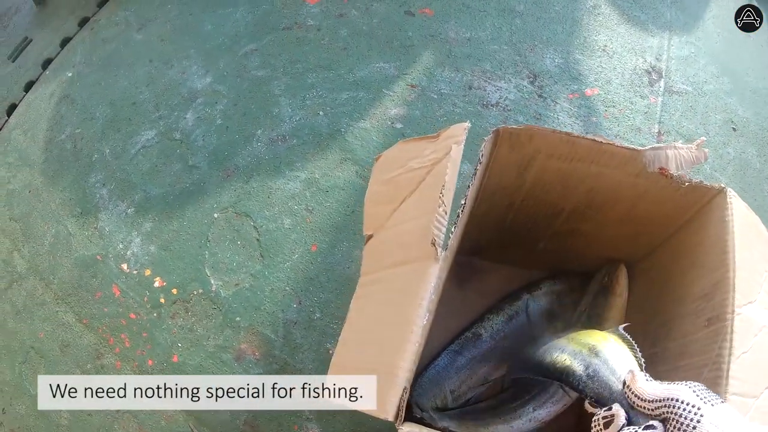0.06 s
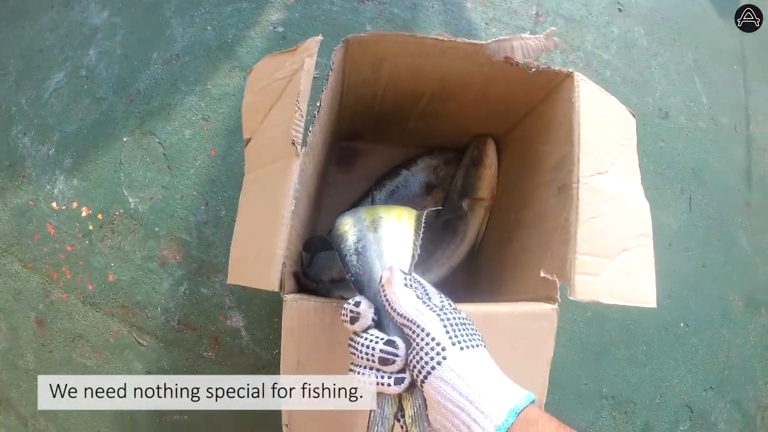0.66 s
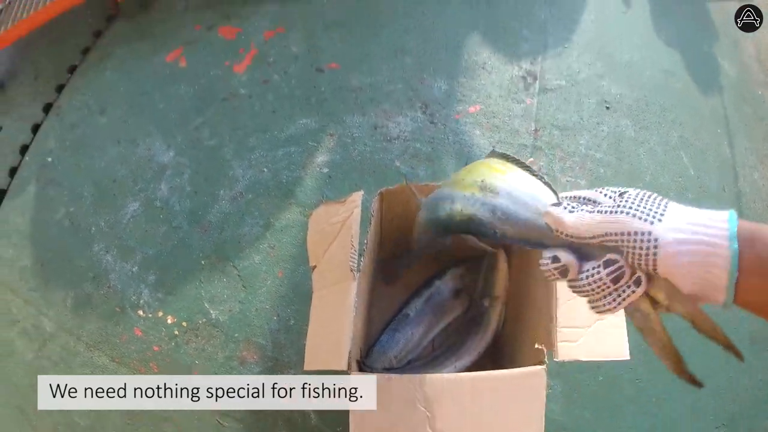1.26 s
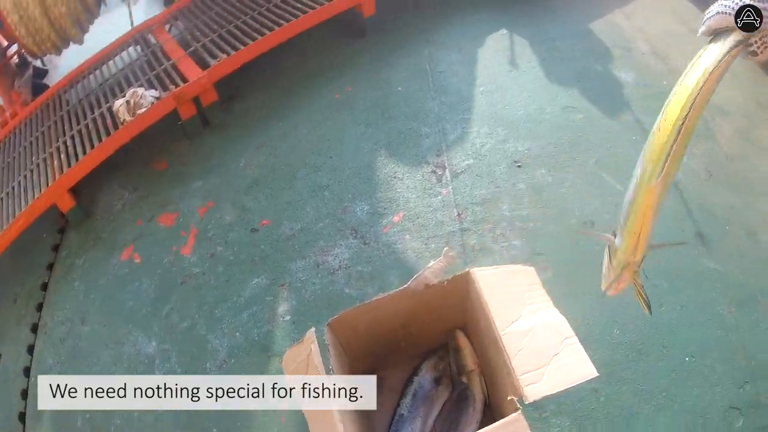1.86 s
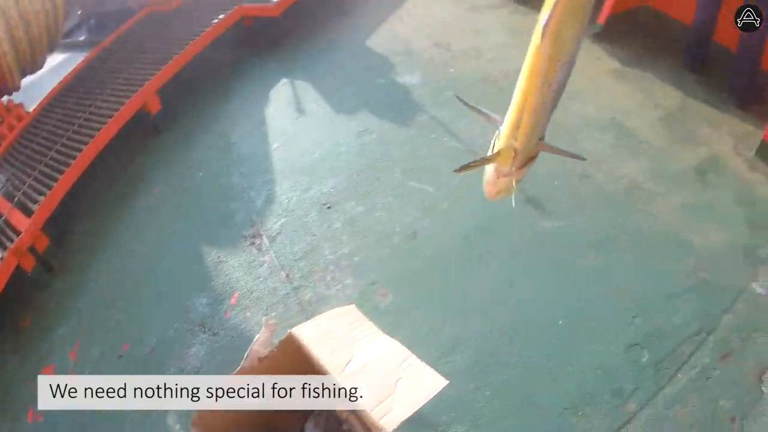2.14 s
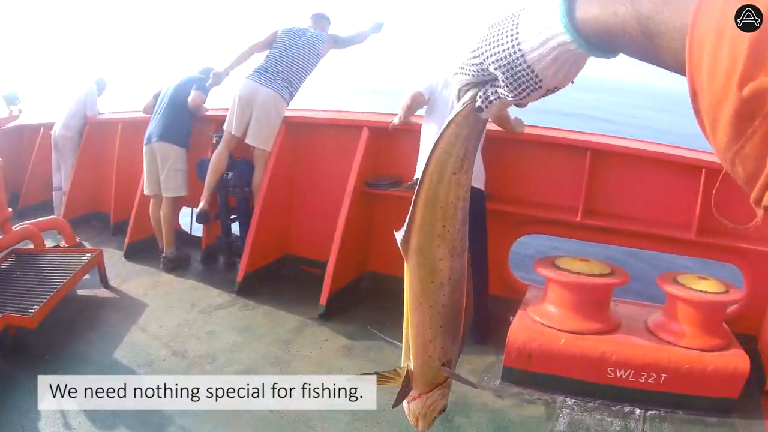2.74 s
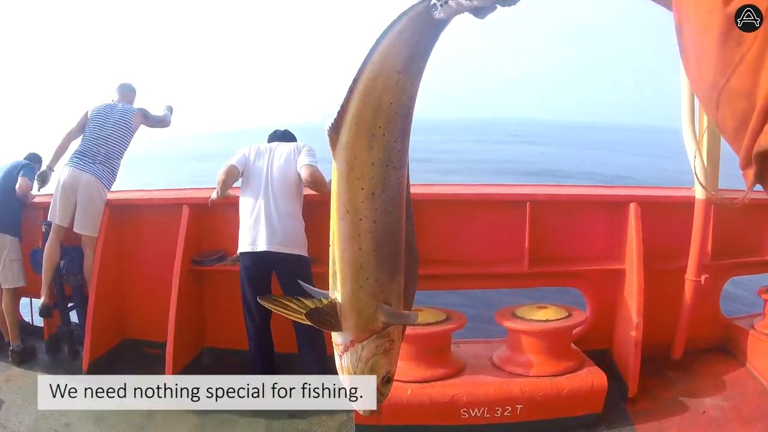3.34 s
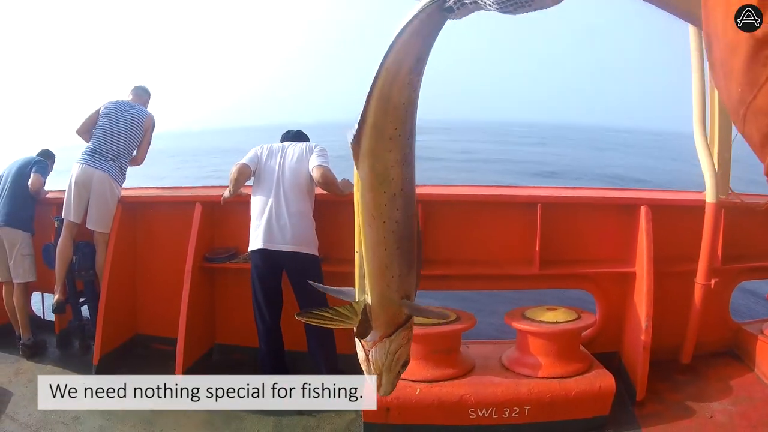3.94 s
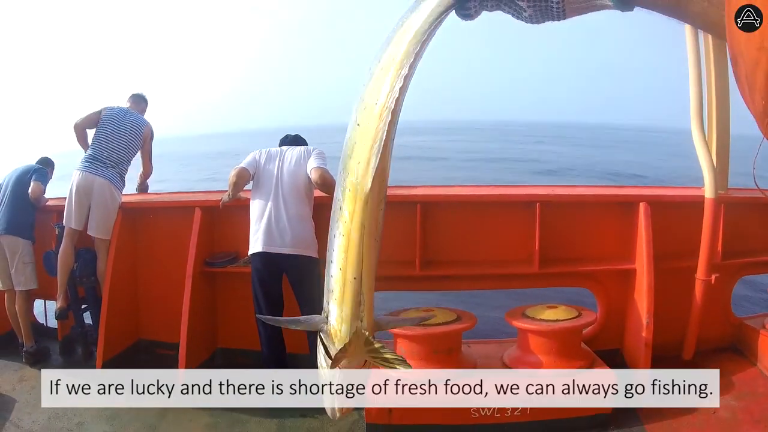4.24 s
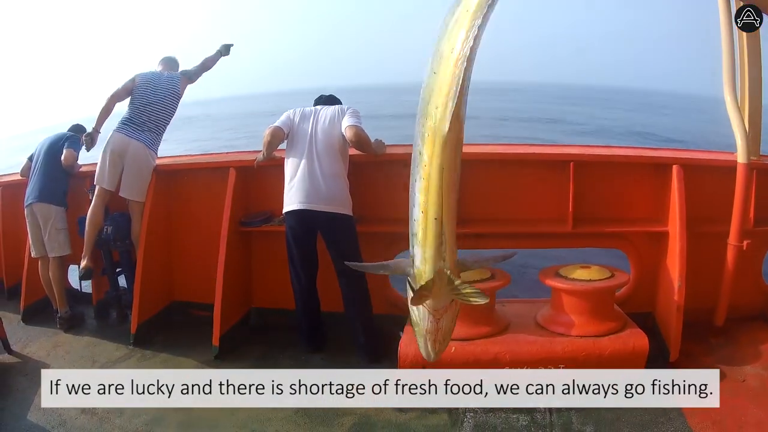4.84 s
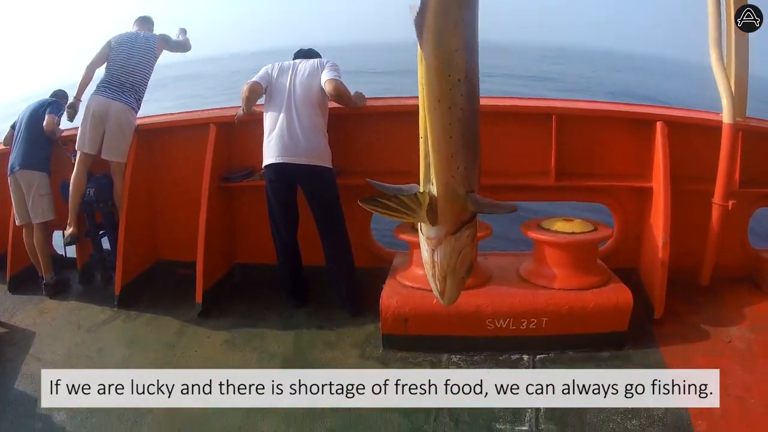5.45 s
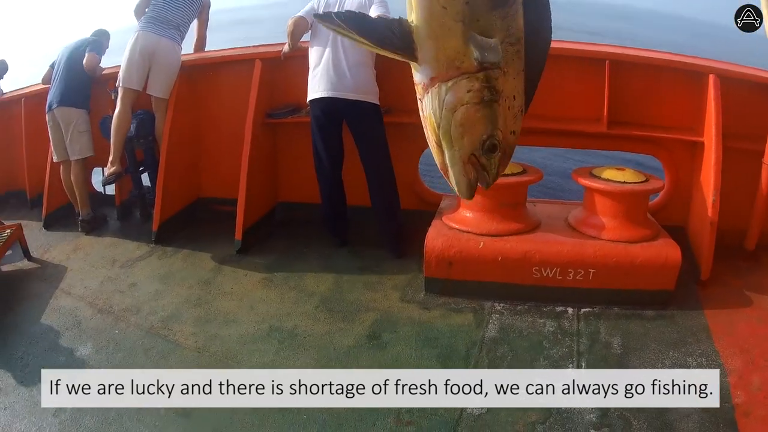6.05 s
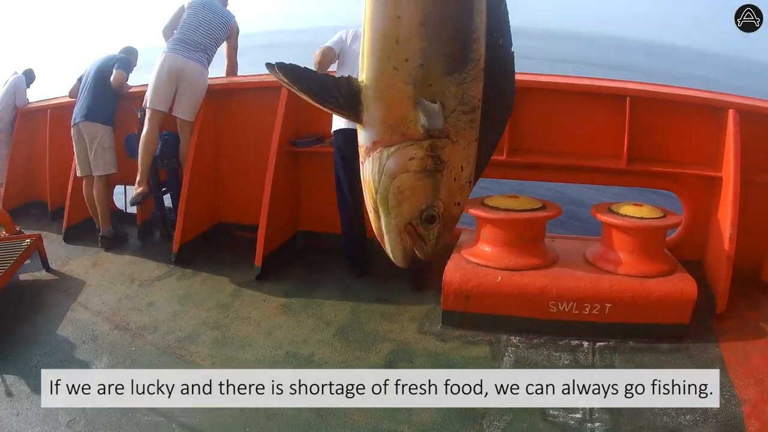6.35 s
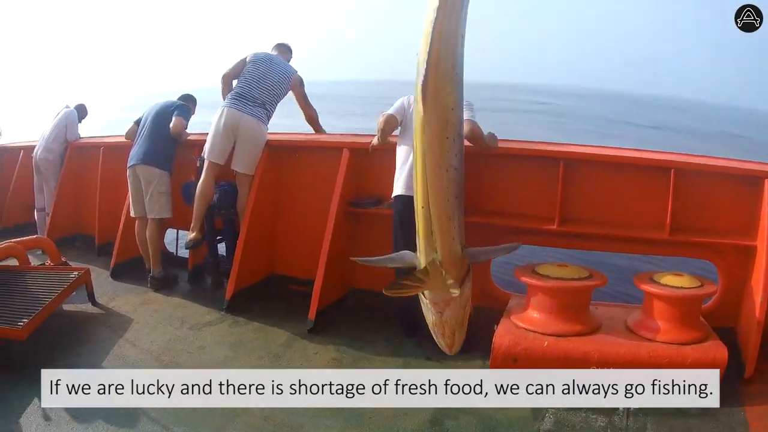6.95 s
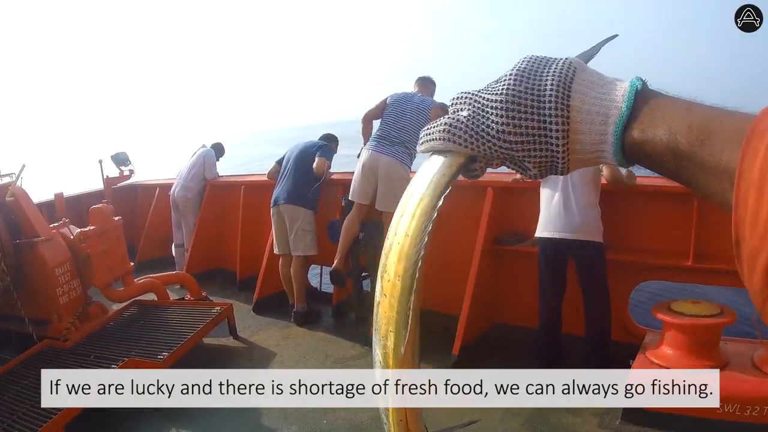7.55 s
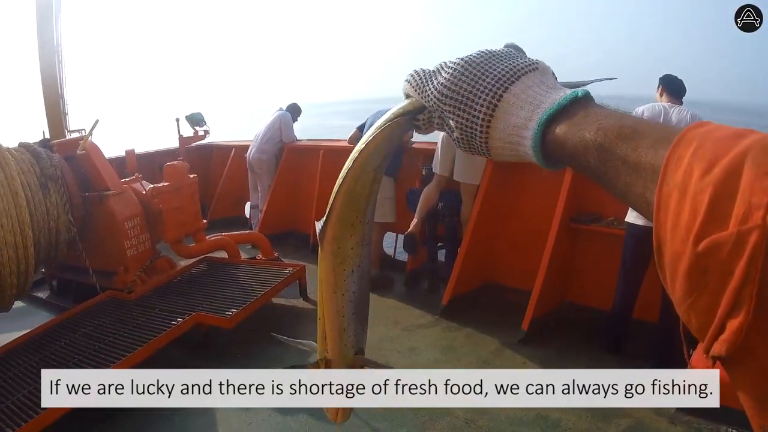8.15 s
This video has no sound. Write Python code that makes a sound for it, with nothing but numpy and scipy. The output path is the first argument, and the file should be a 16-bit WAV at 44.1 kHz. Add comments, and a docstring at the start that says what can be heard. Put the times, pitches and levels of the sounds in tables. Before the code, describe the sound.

Wind buffets a single microphone on the open deck of a ship at sea. Throughout, a diesel engine throbs below with a low rumble, the steel plating hums, and ventilation fans roar with a thin, wavering whine that swells and fades. A very faint high hiss returns every few seconds. Low gusts are strongest in the first second and again around 2.3 seconds. From about 1.6 to 3 seconds the machinery changes colour slightly as the listener turns towards the sea, the deep engine tones softening. Close by, at about 2.5 and 2.8 seconds, a gloved hand holding a fish ticks softly. The wind eases through the middle, with brief low bumps near 4.2 and 6 seconds. From about 6.7 seconds the drone shifts back, and more low gusts thump the microphone between 7 and 7.5 seconds, the machinery running on to the end at about 8 seconds.

```python
"""On the open deck of a ship at sea, one microphone at the listener's position, wind buffeting it.
From the start a diesel generator throbs below, the steel bulwark hums and the engine-room fans roar
and whine; a faint hiss returns every few seconds. After 1.6 s the listener looks up and turns to the
sea, and the machinery changes colour. Close by, at 2.5 and 2.8 s, a gloved hand holding a fish ticks
softly. From 6.7 s the listener turns back towards the winches, and more low gusts hit the microphone."""
import sys
import numpy as np
from scipy.fft import rfft, irfft, next_fast_len
from scipy.io import wavfile
from scipy.ndimage import map_coordinates

SR = 44100
rng = np.random.default_rng(int(sys.argv[2]) if len(sys.argv) > 2 else 0)


def transcribe(signal):
    """Save signal, clipped to [-1, 1], as a 16-bit WAV file at the path in sys.argv[1]."""
    frames = np.atleast_2d(signal).T
    limited = np.clip(frames, -1, 1)
    pcm = np.round(limited * 32767).astype(np.int16)
    wavfile.write(sys.argv[1], SR, pcm)


N = 361619
CYCLE_HZ = 7.5  # the diesel's four-stroke cycle


def amp(db):
    """Decibels to gain."""
    return 10 ** (np.asarray(db) / 20)


def unit(x):
    """Scale to rms 1."""
    return x / np.sqrt(np.mean(x ** 2) + 1e-20)


def clock():
    """Time of each sample in seconds."""
    return np.arange(N) / SR


def curves(rows):
    """One value per sample for each column after the time."""
    times, *columns = np.transpose(rows)
    return [np.interp(clock(), times, column) for column in columns]


def wobble(rate):
    """A smooth random curve, rate knots a second."""
    return map_coordinates(rng.standard_normal(int(N * rate / SR) + 4), [clock() * rate])


def swell(t, sigma):
    """A bell-shaped rise and fall around time t."""
    return np.exp(-.5 * ((clock() - t) / sigma) ** 2)


def swing(period_s, crest_s):
    """A regular swing between -1 and 1, highest at crest_s."""
    return np.cos(2 * np.pi * (clock() - crest_s) / period_s)


def filtered(x, response):
    """Filter x by a gain that is a function of frequency."""
    size = next_fast_len(N + SR // 2)
    return irfft(rfft(x, size) * response(np.fft.rfftfreq(size, 1 / SR)), size)[:N]


def rush(spectrum):
    """Noise of rms 1 coloured by (f/Hz, level/dB) points."""
    f, db = np.transpose(spectrum)
    white = rng.standard_normal(N)
    return unit(filtered(white, lambda hz: amp(np.interp(np.log(hz + 1), np.log(f), db))))


def resonant_noise(centre_hz, width_hz):
    """Noise of rms 1 in one steep-sided resonance."""
    white = rng.standard_normal(N)
    return unit(filtered(white, lambda hz: 1 / (1 + (2 * (hz - centre_hz) / width_hz) ** 2)))


def tone(hz, drift):
    """A sine of rms 1 whose phase wanders by drift radians."""
    return np.sqrt(2) * np.sin(2 * np.pi * (hz * clock() + rng.random()) + drift)


def diesel(seaward):
    """Below deck, uneven firing sounds multiples of the cycle rate, all on one hunting shaft."""
    # the engine's low lines: multiple of the cycle rate, relative level/dB
    orders = [(4, -11), (6, -3), (8, 0.5), (9, -5.5), (11, -12)]
    shaft_drift = .035 * wobble(1.52)
    lines = sum(amp(db + 2 * wobble(3.06)) * tone(k * CYCLE_HZ, k * shaft_drift) for k, db in orders)
    return amp(-30.5 - 4.5 * seaward) * lines


def exhaust(engine_db):
    """The funnel's rumble and the casing's roar swell once per engine cycle."""
    # spectrum of the funnel: f/Hz, relative level/dB
    funnel_spectrum = [(50, -25), (92, -16), (107, -10), (120, -14), (136, -0.5), (160, 0.5), (170, -7),
                       (182, -4.5), (196, -10), (240, -30), (600, -72.5)]
    # spectrum of the casing: f/Hz, relative level/dB
    casing_spectrum = [(120, -27), (205, -4.5), (240, -2), (280, 0), (310, -3.5), (380, -2.5), (500, -5.5),
                       (600, -8.5), (720, -12), (1000, -18.5), (1600, -45), (4000, -90)]
    funnel_db = -31.5 + .66 * wobble(1.98)
    throb = tone(CYCLE_HZ, .16 * wobble(1.85))
    funnel = amp(funnel_db + .88 * throb) * rush(funnel_spectrum)
    casing = amp(engine_db - 1.46 + .59 * throb) * rush(casing_spectrum)
    return funnel + casing


def bulwark(engine_db, upright):
    """The engine shakes the plating into a wavering hum, louder as the listener looks up."""
    # resonances of the steel plates: f/Hz, width/Hz, relative level/dB
    plates = [(106.1, 6.4, 1.5), (119.8, 2.2, 2), (183, 7.4, 0.5), (231.6, 7.3, -2), (244.9, 7.8, -3),
              (269.7, 8.4, 1.5), (358.5, 8.6, -5), (490.4, 20, -7), (531, 14, -8.5)]
    hum_db = -44 + 1.7 * (engine_db - engine_db.mean()) + 3.5 * upright
    return amp(hum_db) * sum(amp(db) * resonant_noise(hz, width) for hz, width, db in plates)


def fans(upright, seaward):
    """Air roars in the ducts; an inboard duct mouth and the louvres' hiss fade on turning to the sea."""
    # spectrum of the fan roar: f/Hz, relative level/dB
    roar_spectrum = [(300, -27), (700, -8), (900, -7), (1080, -5.5), (1210, 0), (1330, -1.8), (1450, -11.5),
                     (1540, -14.5), (1680, -23), (1900, -20.5), (2130, -25.5), (2320, -25), (2650, -36),
                     (5000, -65)]
    # spectrum of air through the louvres: f/Hz, relative level/dB
    louvre_spectrum = [(1200, -17.5), (2700, -6.5), (3250, -7), (3800, 0.5), (4300, -6), (4800, -8.5),
                       (5200, -14.5), (5550, -10.5), (6600, -14.5), (7200, -13.5), (8200, -21),
                       (15000, -40)]
    roar = amp(-35 + .47 * wobble(1.35) + .4 * wobble(8)) * rush(roar_spectrum)
    duct_mouth = amp(-49 + 10.5 * upright - 15 * seaward) * resonant_noise(1385, 240)  # at head height
    louvres = amp(-57 - 1.3 * upright - 1.74 * seaward) * rush(louvre_spectrum)
    return roar + duct_mouth + louvres


def whine(seaward):
    """Two wavering fan tones swell and fade in turn, with a quicker pulse on top."""
    # fan tones: f/Hz, level/dB, slow swell depth/dB, slow crest t/s, quick pulse depth/dB
    fan_tones = [(992, -52, 3.5, 3.83, 1), (1109, -44, 4, 0.35, 3)]
    # change in each tone when facing the sea: level/dB
    seaward_change = [5, -5]
    out = np.zeros(N)
    for (hz, db, slow_db, crest, quick_db), turn_db in zip(fan_tones, seaward_change):
        slow_swell = slow_db * swing(period_s=2.38, crest_s=crest)
        quick_pulse = quick_db * swing(period_s=.96, crest_s=.27)
        level_db = db + slow_swell + quick_pulse + turn_db * seaward + 1.5 * wobble(11)
        out += amp(level_db) * tone(hz, .5 * wobble(7))
    return out


def wind():
    """Turbulence presses right on the microphone port; sharp eddies reach higher in pitch."""
    # course of the gusts: t/s, relative level/dB
    gusts = [(0, -27.5), (.5, -23), (.63, -33), (.78, -28), (1.15, -28), (1.4, -35), (2.05, -29),
             (2.3, -25.5), (2.9, -29), (3.9, -34), (4.9, -38), (5.3, -32.5), (6.9, -34.5), (7.42, -27.5),
             (7.68, -40), (8.2, -30)]
    # spectrum of the buffeting: f/Hz, relative level/dB
    buffet_spectrum = [(8, -38), (17, -5.5), (32, 0.5), (55, -2), (70, -7), (95, -20), (200, -21),
                       (600, -52), (2000, -100)]
    # sudden eddies: t/s, level/dB, sigma/s, centre f/Hz
    eddies = [(.03, -23, .018, 55), (.215, -24, .014, 55), (0.71, -22.5, .012, 55), (2.365, -22, .018, 45),
              (4.221, -22.5, 0.016, 110), (5.796, -29, 0.038, 125), (6.115, -25, 0.035, 42),
              (6.999, -19, .012, 146), (7.12, -25, 0.039, 130), (7.4, -22, .018, 55)]
    gust_db, = curves(gusts)
    flutter_db = 2 * wobble(9)
    out = amp(gust_db - 1 + flutter_db) * rush(buffet_spectrum)
    for t, db, sigma, hz in eddies:
        out += amp(db) * swell(t, sigma) * resonant_noise(hz, width_hz=.81 * hz)
    return out


def faint_hiss():
    """A thin, high hiss comes and goes."""
    # crests of the hiss: t/s, level/dB
    crests = [(.2, -73), (2.65, -73), (4.7, -73), (7.15, -73)]
    return sum(amp(db) * swell(t, sigma=.18) for t, db in crests) * resonant_noise(7150, 450)


def hoots():
    """The fan roar gathers briefly around one pitch."""
    # hoots in the roar: t/s, level/dB, f/Hz, sigma/s
    peaks = [(0.383, -35.5, 1330, 0.035), (5.38, -33, 1274, 0.03)]
    return sum(amp(db) * swell(t, sigma) * tone(hz, wobble(50)) for t, db, hz, sigma in peaks)


def handling():
    """Close to the microphone, small slips of the glove on the fish tick and die at once."""
    # slips in the grip: t/s, level/dB, ring f/Hz, width/Hz, t60/s
    ticks = [(2.532, -30, 700, 500, 0.12), (2.533, -41, 2100, 800, 0.043), (2.555, -56, 8400, 600, .08),
             (2.560, -39.5, 3760, 1500, 0.05), (2.560, -47.5, 7200, 2200, .025),
             (2.581, -46, 4600, 3500, .025), (2.839, -44, 4670, 1000, .027)]
    out = np.zeros(N)
    for t, db, ring_hz, width_hz, t60 in ticks:
        age = np.maximum(clock() - t, 0)
        attack = 1 - np.exp(-age / .0008)
        decay_db = 60 * np.minimum(age / t60, 2)
        out += amp(db - decay_db) * attack * resonant_noise(ring_hz, width_hz)
    return out


def scene():
    """Machinery, wind and handling at one microphone on deck; the listener's pose sets the balance."""
    # the listener looks up, turns to the rail, then back to the winches: t/s, upright 0-1, seaward 0-1
    pose = [(0, 0.2, 0), (1.6, 0, 0), (2.35, 0.8, 0.4), (2.9, 1, 1), (6.7, 0.9, 0.92), (7.3, 1, 0.5),
            (8.2, 1, 0.23)]
    # the engine's low roar, which the bulwark's hum follows: t/s, relative level/dB
    engine_level = [(0.0, -34), (2.4, -32.5), (2.65, -32), (3.06, -33.5), (3.68, -31), (4.04, -32.5),
                    (4.36, -32.5), (6.58, -34), (7.08, -32), (8.2, -32.5)]
    upright, seaward = curves(pose)
    engine_db, = curves(engine_level)
    engine = diesel(seaward) + exhaust(engine_db) + bulwark(engine_db, upright)
    ventilation = fans(upright, seaward) + whine(seaward) + hoots()
    return (engine + ventilation + wind() + faint_hiss() + handling())[None]


def record(dry):
    """The camera adds its own even hiss and keeps nothing above its band limit."""
    top_hz, fade_s = 15250, .002
    hiss = amp(-62.5) * rng.standard_normal(N)
    fade = np.clip(np.minimum(clock(), clock()[::-1]) / fade_s, 0, 1)
    return filtered(fade * (dry[0] + hiss), lambda hz: hz < top_hz)[None]


dry = scene()
out = record(dry)
transcribe(out)
```